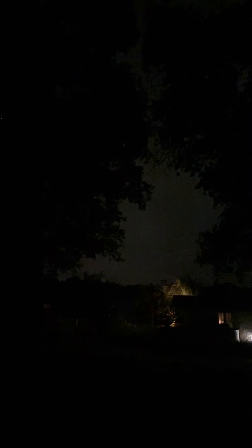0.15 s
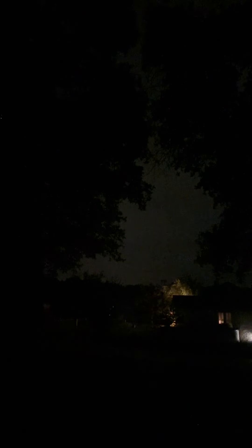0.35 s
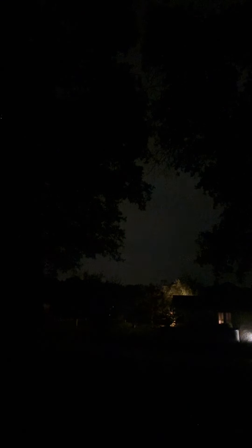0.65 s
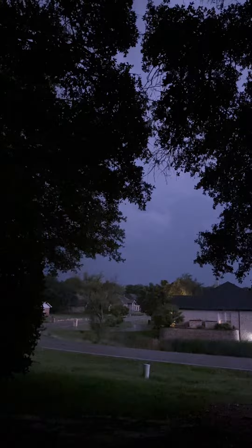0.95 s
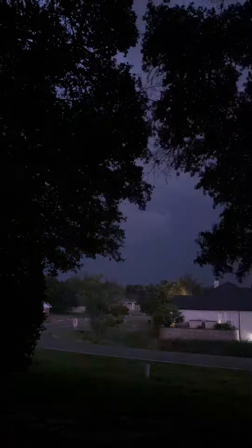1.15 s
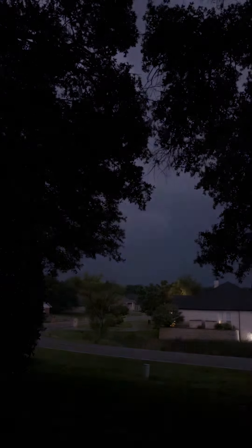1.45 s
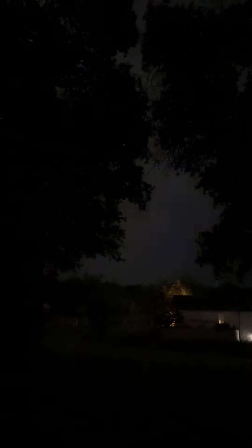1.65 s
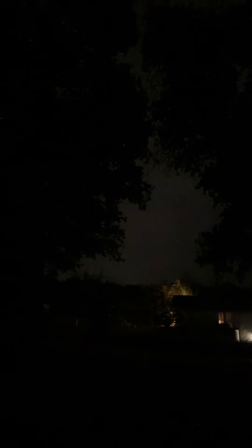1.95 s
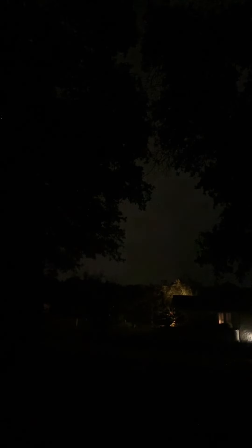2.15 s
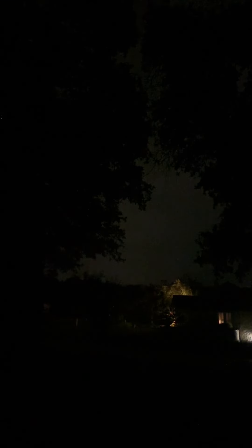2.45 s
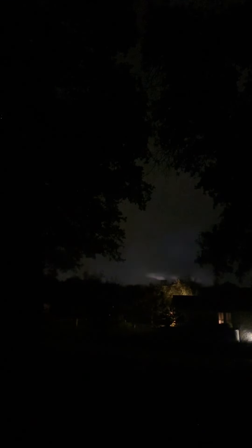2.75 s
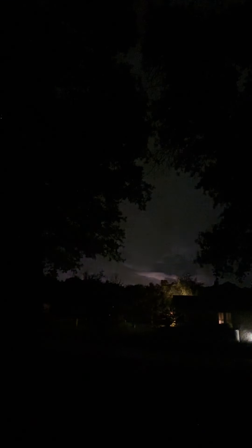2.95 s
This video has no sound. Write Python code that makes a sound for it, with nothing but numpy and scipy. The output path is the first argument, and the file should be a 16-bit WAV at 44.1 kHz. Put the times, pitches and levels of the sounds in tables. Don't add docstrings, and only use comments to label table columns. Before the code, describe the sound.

Dense, fine-grained rain in a dark garden, over a deep uneven thunder rumble. Light leaf ticks scatter throughout, one drop cracks right beside the phone near one second, and faint hollow knocks come around two seconds.

```python
import sys
import numpy as np
from scipy import signal
from scipy.fft import rfft, irfft
from scipy.io import wavfile
from scipy.ndimage import uniform_filter1d

SR = 44100
rng = np.random.default_rng(int(sys.argv[2]) if len(sys.argv) > 2 else 0)


def store_wav(level_fs):
    pcm = np.round(np.clip(np.atleast_2d(level_fs), -1, 1) * 32767)
    wavfile.write(sys.argv[1], SR, pcm.T.astype(np.int16))


def amplitude_ratio(level_db):
    exponent = np.asarray(level_db, float) / 20
    return 10 ** exponent


N = 136710
RAIN_TOP_HZ = 15830


def rms_one(x):
    return x / np.sqrt(np.mean(x ** 2) + 1e-20)


def drift(rate):
    r = np.exp(-80 * np.pi * rate / SR)
    slow = signal.lfilter([1], [1, -2 * r, r * r], rng.standard_normal(N // 40 + 2002))[2000:]
    return np.interp(np.arange(N) / 40, np.arange(len(slow)), rms_one(slow))


def ring(clicks, hz, t60):
    r, w = amplitude_ratio(-60 / (t60 * SR)), 2 * np.pi * hz / SR
    return signal.lfilter([0, np.sin(w)], [1, -2 * r * np.cos(w), r * r], clicks + 1e-18)


def cut(x, hz, kind, order=2):
    return signal.sosfilt(signal.butter(order, hz, kind, fs=SR, output="sos"), x)


def coloured(x, spectrum):
    hz = np.maximum(np.fft.rfftfreq(x.shape[-1], 1 / SR), 1)
    at, db = np.transpose(spectrum)
    gain = amplitude_ratio(np.interp(np.log(hz), np.log(at), db))
    return rms_one(irfft(rfft(x) * gain, x.shape[-1]))


def add(out, s, sound):
    i = int(s * SR)
    out[i:i + len(sound)] += sound[:N - i]


def dying(t60, size=4000):
    return rng.standard_normal(size) * amplitude_ratio(-60 * np.arange(size) / SR / t60)


def evened(x):
    span, share = int(0.094 * SR), 0.6
    swell = uniform_filter1d(uniform_filter1d(x[0] ** 2, span), span)
    return rms_one(x / (swell + 1e-9) ** (share / 2))


def rain():
    # f/Hz, level/dB per Hz
    rain_colour = [(350, -3.5), (900, -2), (2500, -3.5), (4300, -3.5), (5300, 1.5), (7500, -2.5),
                   (10200, -5), (11800, -8.5), (15500, -6.5)]
    rain_db, patchy_db = -43.5, 0.9
    drops_per_s, spread_db, cycles, grain_share = 2500, 2.5, 2.24, 0.34
    sizes = amplitude_ratio(spread_db * np.minimum(rng.exponential(1, (2, N)), 4)) * rng.choice([-1, 1], (2, N))
    born = rng.random((2, N)) < drops_per_s * amplitude_ratio(2.0 * drift(7)) / SR
    dealt = rng.integers(0, 12, (2, N))
    white = rng.standard_normal((2, 2, N))
    edges, out, together = np.geomspace(250, 19000, 13), 0, drift(20)
    for k, (low, high) in enumerate(zip(edges, edges[1:])):
        hz = np.sqrt(low * high)
        pings = ring(sizes * born * (dealt == k), hz, cycles / hz)
        grains = rms_one(cut(pings, [low, high], "band", order=1))
        hiss = rms_one(cut(white[k % 2], [low, high], "band"))
        patch = amplitude_ratio(patchy_db * (0.77 * together + drift(14.6)))
        mix = grain_share * grains + np.sqrt(1 - grain_share ** 2) * hiss
        out = out + np.sqrt(hz) * patch * mix
    top = [(RAIN_TOP_HZ, rain_colour[-1][1]), (RAIN_TOP_HZ + 60, -60)]
    return amplitude_ratio(rain_db) * coloured(out, [(100, -59)] + rain_colour + top)


def ticks():
    # t/s, peak level/dB, f/Hz, time to fall 60 dB/s, width each way/octaves
    leaf_drops = [(0.3355, -35, 13000, 0.03, 0.32), (0.353, -35, 4500, .01, .5),
                  (0.4457, -28, 4640, 0.0049, .2), (0.4459, -29.5, 5000, 0.0044, 1),
                  (.5420, -26, 9500, 0.0067, 0.7), (0.616, -30, 12500, 0.006, .5),
                  (1.0925, -35, 9900, .006, 0.68), (1.0965, -39, 9500, 0.0071, 0.78),
                  (1.24, -30.5, 10000, 0.005, 0.72), (1.5475, -24, 8740, 0.0059, .7),
                  (1.665, -29.5, 10950, .02, 0.19), (1.8538, -28, 5280, 0.0043, 0.25),
                  (1.8544, -24, 10500, 0.0042, .7), (1.867, -27, 11000, 0.0057, 0.4),
                  (1.929, -36, 10500, 0.0045, 0.34), (2.29, -37, 7400, 0.0097, .2),
                  (2.4498, -32, 6900, 0.023, 0.5), (2.46, -31.5, 6900, .015, 0.57),
                  (2.470, -32, 3000, 0.025, 1.3), (2.479, -36, 3500, 0.017, 1.2),
                  (2.891, -34.5, 4570, 0.014, 0.19)]
    spray_db, spray_t60 = -12, 0.11
    out = np.zeros(N)
    for s, db, hz, t60, octaves in leaf_drops:
        width = 2 ** max(octaves, 0.05)
        hit = dying(t60) + 3.3 * (np.arange(4000) == 4)
        burst = cut(hit, [hz / width, min(hz * width, 18000)], "band", order=3)
        spray = amplitude_ratio(spray_db) * cut(dying(spray_t60), [3300, 14000], "band")
        add(out, s, amplitude_ratio(db) * (burst / np.abs(burst).max() + 0.5 * spray))
    return irfft(rfft(out) * (np.fft.rfftfreq(N, 1 / SR) < RAIN_TOP_HZ), N)


def snap():
    snap_s, snap_db, jolt_db = 1.0854, -0.5, -27
    echo_s, echo_gain, low_hz = 0.000184, 0.4, 4800
    body_db, spray_db = -32, -37
    click = np.zeros(4000)
    for k in range(5):
        click[:120] += echo_gain ** k * np.sinc(np.arange(120) - 40 - k * echo_s * SR)
    bright = cut(cut(click, low_hz, "high", order=6)[::-1], low_hz, "high", order=6)[::-1]
    spray = cut(dying(0.058), [low_hz, 14500], "band", order=4)
    sound = bright / np.abs(bright).max() + amplitude_ratio(body_db) * click + amplitude_ratio(spray_db) * spray
    out = np.zeros((2, N))
    add(out[0], snap_s - 40 / SR, amplitude_ratio(snap_db) * sound)
    add(out[1], snap_s - 40 / SR, amplitude_ratio(snap_db + jolt_db) * ring(click, 1300, 0.004))
    return out


def knocks():
    # t/s, peak level/dB, brightness/dB
    drips = [
        (1.9043, -35, -5),
        (1.912, -45, -13),
        (1.921, -49.5, 10),
        (1.962, -43.5, -7),
        (2.0, -44.5, -5),
        (2.4704, -42.5, 2.5),
        (2.478, -48, 0),
        (1.70, -53.5, 12),
    ]
    # f/Hz, level/dB, time to fall 60 dB/s
    lid_tones = [(244, -6.5, 0.2), (289, -0.5, 0.11), (360, -5, 0.12), (408.6, -1.5, 0.1),
                 (756, -2.5, 0.034), (967, -8, 0.045), (1280, -5, .03), (1750, -8.5, 0.064)]
    s, db, bright_db = np.transpose(drips)
    out, chance = np.zeros(N), rng.normal(0, 1.1, (len(s), len(lid_tones)))
    for k, (hz, level_db, t60) in enumerate(lid_tones):
        clicks = np.zeros(N)
        clicks[(s * SR).astype(int)] = amplitude_ratio(db + level_db + bright_db * (hz > 500) + chance[:, k])
        out += ring(clicks, hz, t60) * (-1) ** k
    return out


def thunder():
    # t/s, level/dB
    roll_swells = [(0.0, -48), (0.06, -41), (0.1, -42), (0.78, -47.5), (0.83, -31.5), (0.94, -41.5),
                   (1.16, -41), (1.18, -51), (1.42, -38.5), (1.56, -49), (1.61, -36.5), (1.69, -52),
                   (1.77, -42.5), (1.8, -47.5), (2.42, -40.5), (2.49, -54), (2.86, -36.5), (3.1, -50)]
    # f/Hz, level/dB per Hz
    roll_colour = [(20, -27), (50, -1), (70, -0.5), (95, -5), (135, -7.5), (170, -12.5), (280, -17.5),
                   (420, -27)]
    # t/s, level/dB
    boom_swells = [(0.0, -61), (0.02, -48.5), (0.72, -41.5), (0.75, -66), (0.81, -45.5), (1.84, -46.5),
                   (1.86, -61), (1.95, -41.5), (3.01, -53), (3.1, -49)]
    boom_hz, boom_width_hz, boom_db = 106.84, 5.6, 1.5
    murmur_hz, murmur_follows = 87.2, 0.036
    white, t = rng.standard_normal((2, 2, N + SR)), np.arange(N) / SR
    dark = cut(coloured(white[0], roll_colour + [(3000, -70)]), 398, "low", order=6)
    body = rms_one(dark[:, SR:])
    level = np.interp(t, *np.transpose(roll_swells))
    even = level.mean() + murmur_follows * (level - level.mean())
    roll = amplitude_ratio(level - 3.5) * evened(cut(body, murmur_hz, "low", order=4))
    murmur = amplitude_ratio(even + 1.0) * cut(body, murmur_hz, "high", order=4)
    t60 = np.log(1000) / np.pi / boom_width_hz
    boom = evened(ring(ring(white[1], boom_hz, t60), boom_hz, t60 / 4)[:, SR:])
    return roll + murmur + amplitude_ratio(np.interp(t, *np.transpose(boom_swells)) + boom_db) * boom


def ports(first, other=None, early_s=0):
    # f/Hz, phase/rad, likeness/0-1, left over right/dB
    port_points = [(60, 0, .99995, 0), (130, 0, .999, .3),
                   (376, 0.7, 0.97, 1), (573, .5, 0.6, 7), (1280, 1.4, 0.42, 0.5), (1710, 0.26, 0.67, 1),
              (2510, -2.5, 0.46, -0.5), (3200, -1.5, 0.44, 0.5), (4000, -0.5, 0.47, -1.5),
              (4800, -2.8, 0.5, -1), (5000, -0.8, 0.1, 0), (5370, -2.5, 1, 1),
                   (5750, -np.pi, .9, 0), (8310, -2 * np.pi, .975, -.2), (10700, -3 * np.pi, .98, -.8)]
    lag_s = 0.000197
    hz = np.fft.rfftfreq(N, 1 / SR)
    at, phase, alike, lean_db = np.transpose(port_points)
    turn = np.interp(hz, at, phase) - 2 * np.pi * lag_s * np.maximum(hz - at[-1], 0)
    alike = np.clip(np.interp(hz, at, alike), 0, 1)
    lean = amplitude_ratio(np.interp(hz, at, lean_db) / 2)
    left = rfft(first)
    right = left * np.exp(1j * (turn + 2 * np.pi * hz * early_s))
    if other is not None:
        right = alike * right + np.sqrt(1 - alike ** 2) * rfft(other)
    return irfft(np.array([left * lean, right / lean]), N)


def scene():
    burst, jolt = snap()
    wide, drops = thunder() + rain(), ticks()
    gust = amplitude_ratio(2.0 * drift(8.0))
    sides = wide[1] + (gust - 1) * cut(wide[1], 5700, "high", order=4)
    near = ports(drops + knocks(), early_s=0.000010)
    near = near + ports(burst, early_s=0.000006) * amplitude_ratio(np.array([[0], [2]]))
    return ports(wide[0], sides) + near + jolt * [[1], [-1]] + 0.35 * drops * [[1], [0]]


def top_cut(x):
    return signal.sosfilt(signal.butter(12, 16670, fs=SR, output="sos"), x)


def record(dry):
    hz = np.fft.rfftfreq(N, 1 / SR)
    top_hz, shelf_db = 16670, -4
    bends = [RAIN_TOP_HZ - 100, RAIN_TOP_HZ + 100, top_hz - 250, top_hz]
    top = amplitude_ratio(np.interp(hz, bends, [0, shelf_db, shelf_db, -60]))
    return top_cut(irfft(rfft(dry) * top, N))


dry = scene()
out = record(dry)
store_wav(out)
```